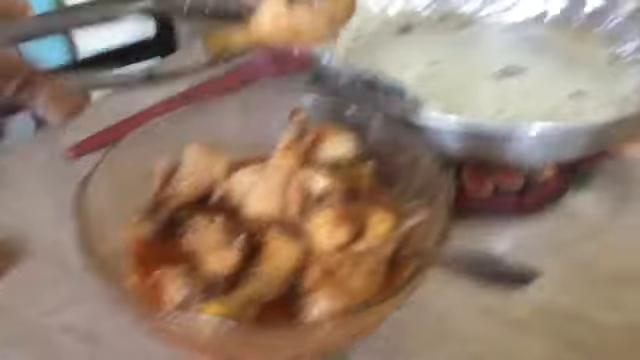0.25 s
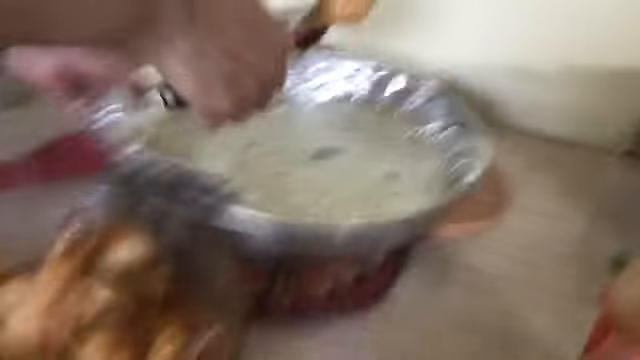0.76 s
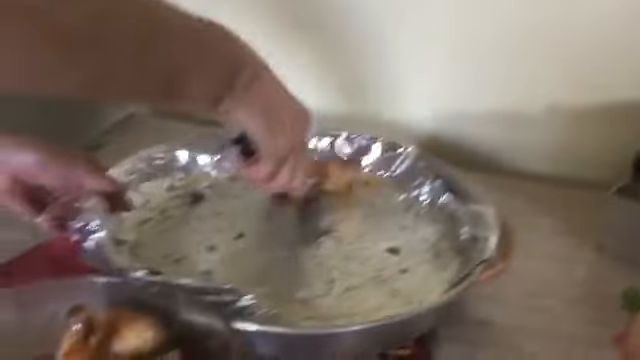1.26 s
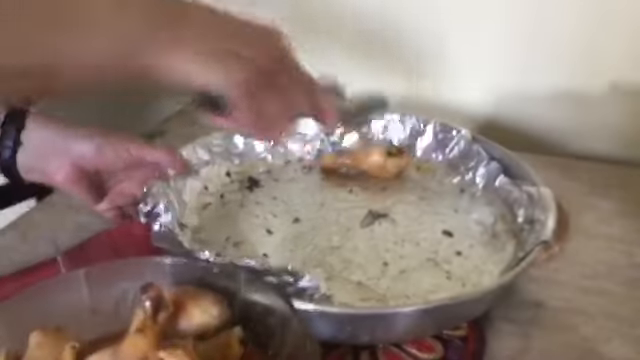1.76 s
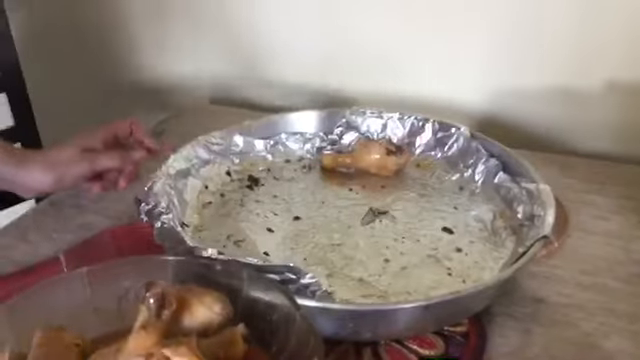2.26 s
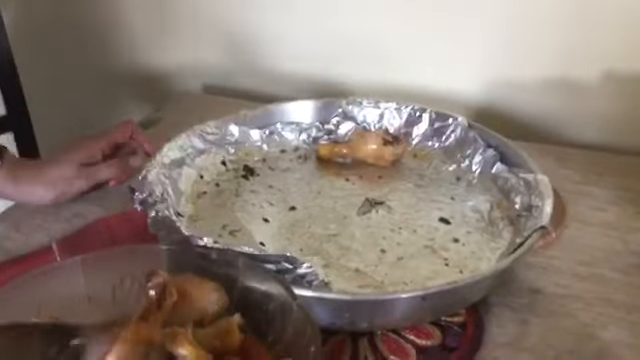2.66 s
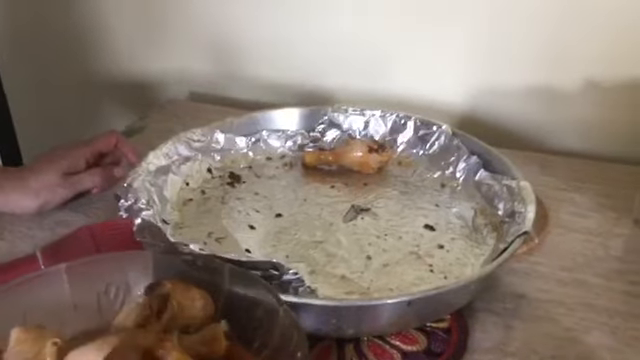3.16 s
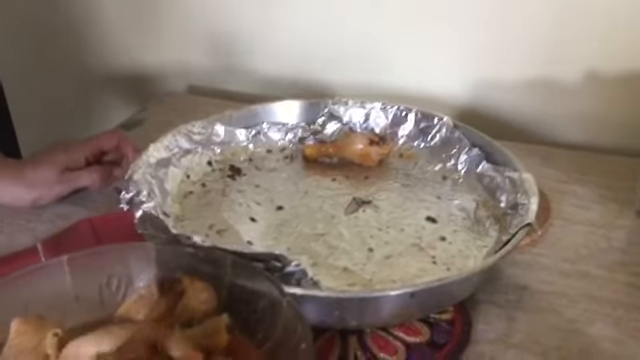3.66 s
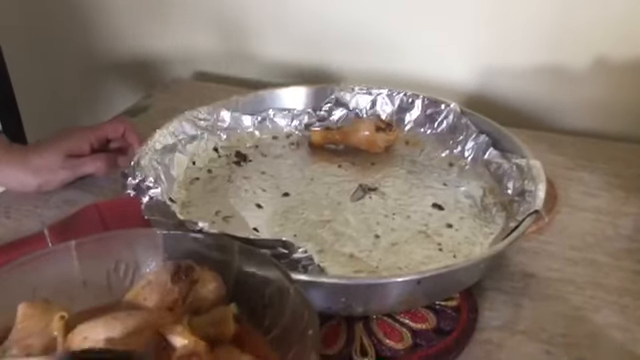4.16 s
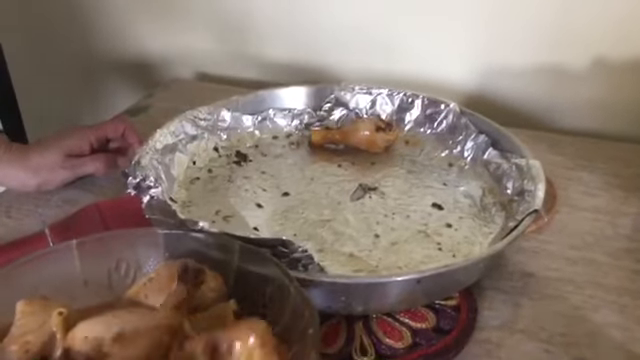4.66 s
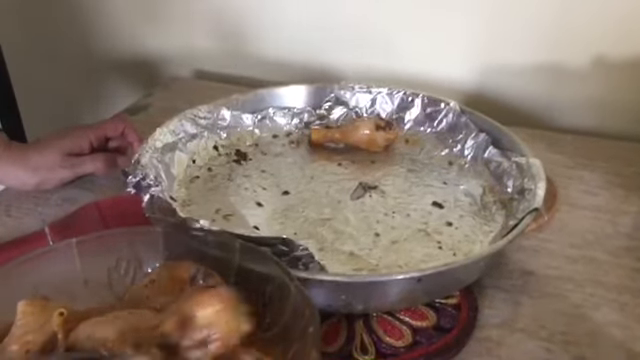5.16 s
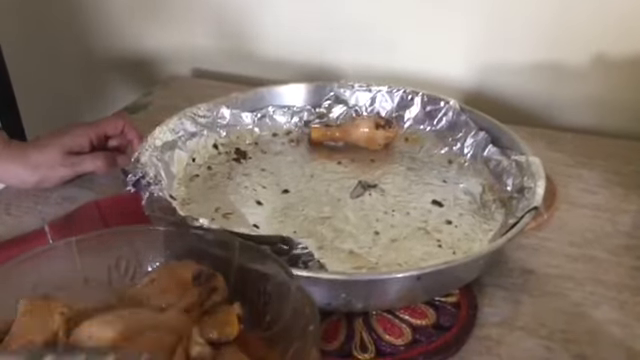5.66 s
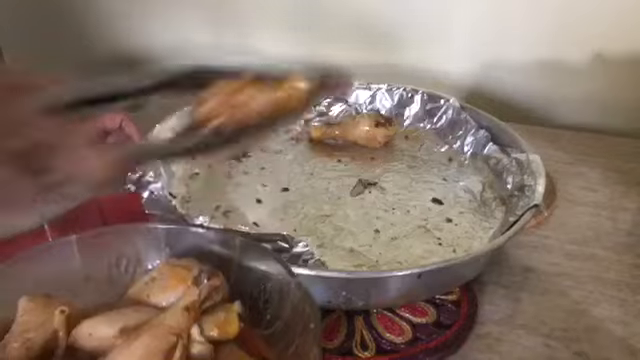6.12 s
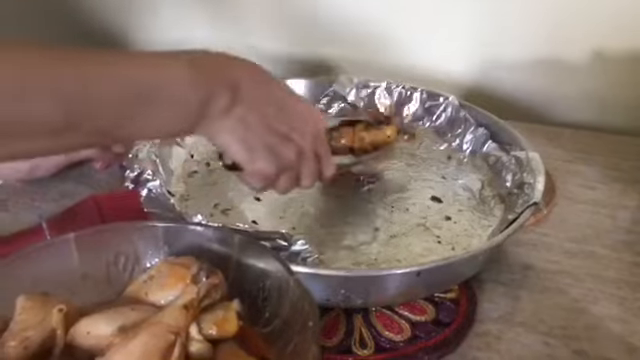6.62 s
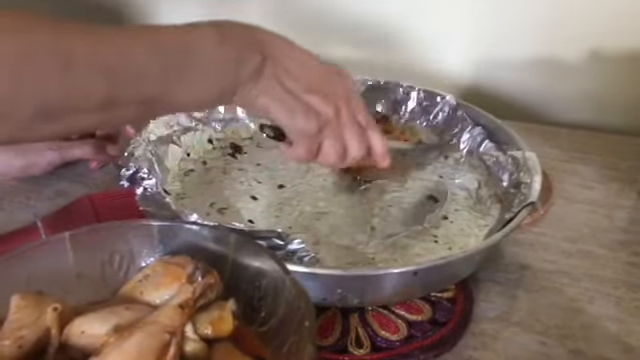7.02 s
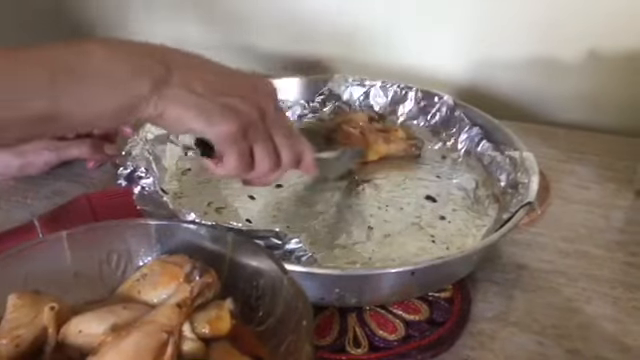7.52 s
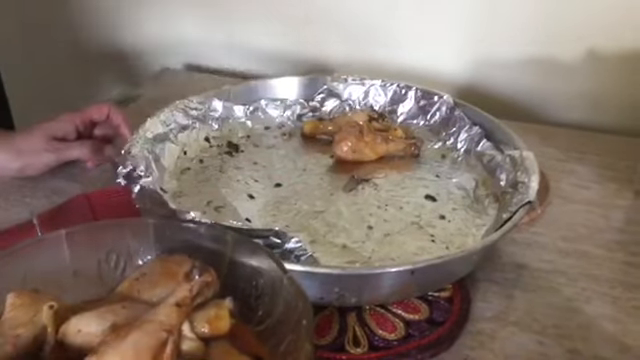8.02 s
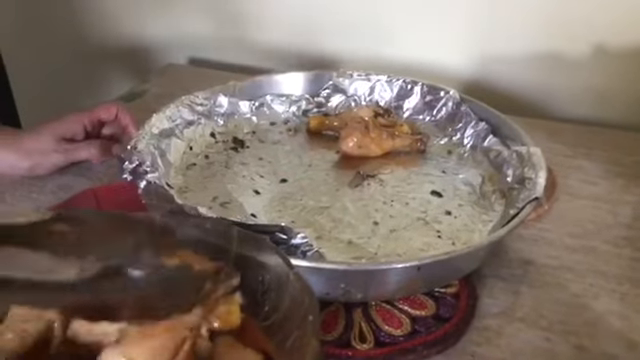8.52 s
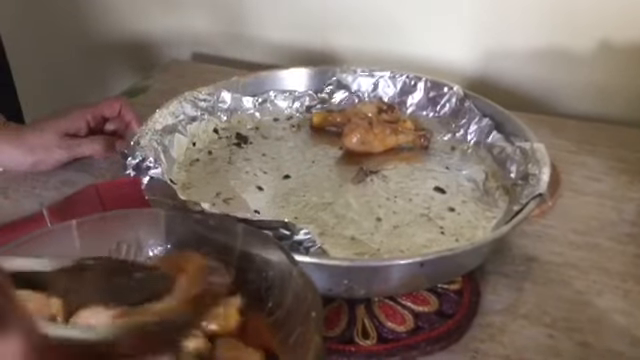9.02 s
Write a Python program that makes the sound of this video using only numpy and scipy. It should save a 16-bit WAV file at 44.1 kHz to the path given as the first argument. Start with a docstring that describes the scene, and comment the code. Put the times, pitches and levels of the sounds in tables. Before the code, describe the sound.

Steel tongs handle saucy food between a glass bowl and a foiled pan. Fumbling rustle and thumps come first, with a dull sheet-metal drop; then evenly spaced bright clacks with short glassy rings, lighter knocks and stick-slip rubbing. A quieter pan touch follows, then near silence and a few final ticks. Close microphone, small room reply, faint appliance hum.

```python
"""Tongs, glass bowl and foiled pan

Quiet kitchen, hand-held microphone: steel tongs lift food from a glass bowl to a foil-lined pan close by.
Clacks and drops are shaped noise that sets steel, glass, table and sheet-metal modes ringing; the room
answers with a noise tail. Finger bumps are falling sine swings, rubbing and rustle are shaped noise,
and beneath lie low rumble, room air and a faint appliance hum of narrow tones."""
import sys
import numpy as np
from scipy import signal
from scipy.fft import rfft, irfft, next_fast_len
from scipy.io import wavfile

SR = 44100
rng = np.random.default_rng(int(sys.argv[2]) if len(sys.argv) > 2 else 0)


def waveform_to_disk(signal):
    """Save audio, clipped to [-1, 1], as 16-bit WAV at the path in sys.argv[1]."""
    frames = np.transpose(np.atleast_2d(signal))
    scaled = np.clip(frames, -1, 1) * 32767
    samples = np.round(scaled).astype(np.int16)
    wavfile.write(sys.argv[1], SR, samples)


N = 409380
FFT_SIZE = next_fast_len(N)
HZ = np.maximum(np.fft.rfftfreq(FFT_SIZE, 1 / SR), 1)

# Spectra, relative: f/Hz, level/dB (per Hz)
RUMBLE_SPECTRUM = [(15, -34.5), (25, -6), (64, 4), (161, 1.5), (220, 0.5), (290, -31.5), (480, -120)]
AIR_SPECTRUM = [(180, -27), (300, -2), (400, -3), (700, -4.5), (1000, -15.5), (1500, -13.5), (2100, -18.5),
                (2600, -23.5), (5600, -31), (9300, -29.5), (13000, -32), (14500, -51.5)]   # steady room air
RUB_SPECTRUM = [(88, -45.5), (150, -15), (194, -21.5), (230, 7.5), (284, 4.5), (454, -10.5), (600, -11.5),
                (900, -17.5), (1500, -50)]
RUSTLE_SPECTRUM = [(350, -34), (600, -5), (1380, -8.5), (1790, -7.5), (3100, -12), (10300, -15.5),
                   (11600, -13), (13700, -20.5), (15000, -46.5)]
CRACK_SPECTRUM = [(1180, -43.5), (2000, -9), (2980, -6.5), (3250, -3.5), (4390, -7), (5420, 0.5),
                  (7720, -9.5), (8430, -4.5), (10800, -3.5), (12800, -5), (15400, -21)]
FOIL_SPECTRUM = [(600, 0.5), (1530, 0.5), (2600, 0.5), (2930, -8.5), (4160, -8), (11100, -15.5),
                 (15500, -23)]   # crunch of the foil

# Slow course of the room rumble: t/s, level/dB
RUMBLE_COURSE = [(0.0, -58), (0.393, -64), (3.36, -61), (8.14, -62), (9.28, -57)]
# Appliance tones: f/Hz, width/Hz, level/dB
HUM_TONES = [(60.5, 0.97, -65), (243, 11, -75), (1018, 9.7, -81), (1253, 25, -81), (2040, 6, -93.5)]
# A finger drags on the recorder's case: full from t/s, held/s, level/dB, dying t60/s
RUB_MOVES = [(0, 0.046, -51.5, 0.084), (.14, .22, -51, 0.08)]
# Hand, sleeve and foil movements: full from t/s, held/s, level/dB, dying t60/s
RUSTLE_MOVES = [(0, .27, -51, 0.47), (.475, 0.0035, -65, 0.29), (.9, 0.13, -65, 0.42),
                (1.185, 0.098, -54, 0.28), (1.48, 0.099, -72.5, 4.5), (1.92, 0.056, -71.5, 0.078),
                (2.51, 0.03, -72, 0.78), (4.72, 0.044, -74.5, 2.56), (6.3, 0.023, -76, 0.29),
                (7.66, 0.026, -75.5, 0.52), (8.83, 0.036, -69.5, 0.096), (8.95, 0.021, -70.5, 0.22),
                (9.14, 0.032, -70, 0.24)]
# Light ticks of steel, foil and food: t/s, level/dB, centre f/Hz
TICKS = [(0.067, -38, 2400), (0.115, -56, 11700), (0.122, -42, 8650), (0.2164, -36.5, 11100),
         (0.467, -54, 6060), (1.209, -40, 4100), (1.962, -55, 5270), (3.191, -49, 7400), (3.191, -55, 4620),
         (3.199, -53.5, 3985), (3.7436, -46, 9570), (5.0133, -51.5, 4720), (5.12, -53.5, 11400),
         (5.323, -49.5, 4060), (6.11, -57.5, 11560), (7.315, -56, 5330), (7.6693, -47.5, 6400),
         (8.3474, -58, 12400), (8.836, -52, 12500), (8.85, -49, 2930), (8.865, -57, 5500),
         (8.924, -51, 1770), (8.926, -57.5, 8600), (8.9456, -53.5, 12000), (8.953, -55, 3030),
         (8.957, -52, 12500), (8.9935, -51.5, 8600), (9.0059, -50.5, 2960), (9.089, -52, 3000),
         (9.145, -60, 6000), (9.1517, -49.5, 9570), (9.189, -57, 12000), (9.197, -52, 8300),
         (9.207, -47, 8360)]
# Fumbling, with fainter ticks at random: start t/s, length/s, ticks (rounded down), mean level/dB
FUMBLING = [(0.00097, 0.36, 12.4, -43.5)]
# Decay of the room: f/Hz, t60/s
ROOM_T60 = [(100, 0.46), (500, 0.36), (2000, 0.24), (6000, 0.36), (14000, 0.069)]
# Clacks of the tongs, levels relative: t/s, crack level/dB, knock level/dB, knock centre f/Hz,
# table thud level/dB, glass ring level/dB, rebound after/s, loss at the rebound/dB,
# two rings of the arm that shift with the grip f/Hz, f/Hz
CONTACTS = [(0.8058, -56.5, -36.5, 1500, -59, -80, 0.012, 6, 5170, 6340),
            (1.134, -47, -31, 2040, -76, -58, 0.02, 19, 5100, 6200),
            (3.2816, -12.5, -20, 1270, -28.5, -48, 0.011, 7.5, 5030, 6100),
            (3.5672, -12.5, -21.5, 1015, -36.5, -50, .0152, 10.5, 5500, 6690),
            (3.8299, -14, -22.5, 860, -49, -30.5, .017, 12.5, 8900, 11020),
            (4.1483, -15.5, -24.5, 1480, -36.5, -62, 0.011, 10, 5600, 6040),
            (4.481, -31, -34, 876, -65.5, -66.5, 0.022, 28, 3480, 5600),
            (4.5019, -35.5, -37, 1055, -52.5, -57.5, 0.0053, -3.5, 3410, 5100),
            (4.5854, -29.5, -23, 1450, -48, -62, 0.011, 25, 1320, 1775),
            (5.3519, -46, -37.5, 1466, -55, -73.5, 0.013, 27, 5200, 6300),
            (8.971, -47, -47.5, 1793, -65, -82, 0.0044, 10, 6000, 7900),
            (9.0933, -41.5, -54, 2500, -47.5, -84, 0.0057, 15, 3020, 6100),
            (9.221, -43.5, -37.5, 2800, -60, -79, 0.011, 25, 4450, 5700)]
# Modes, levels relative: f/Hz, level/dB, t60/s
CLANK_MODES = [(1737, -7, 0.048), (2936, -14.5, .03), (3330, -10.5, 0.012), (4000, -14, 0.035),
               (8437, -2, .02), (9330, -1, 0.017), (10260, -2, 0.018), (11400, 1, .02), (12550, -4, .018),
               (13000, -0.5, 0.02)]   # gripped tongs, which ring only briefly
BOWL_MODES = [(544, -1, 0.1), (860, 1.5, 0.041), (1626, -9.5, 0.066), (2330, -8.5, 0.22),
              (2410, -6.5, 0.34), (2550, -6.5, 0.22), (3570, -5.5, 0.16), (3990, -9.5, 0.15),
              (5030, -1, 0.1), (8170, -3, .09)]
TABLE_MODES = [(95, 0.5, 0.073), (163, -10.5, 0.15), (227.3, -2.5, 0.13), (319, -11.5, 0.099)]
PAN_MODES = [(359.8, -9.5, 0.044), (712, 0, 0.039), (864, -1.5, 0.045), (1070, -1, 0.029),
             (1630, -2, 0.037), (2280, -7.5, 0.055), (3640, -18, 0.053), (4220, -14.5, .03)]   # dull sheet metal
STEEL_MODES = [(1326, -9, 0.13), (1716, 3, 0.09), (2523, -2.5, 0.063), (3560, -13, 0.069),
               (5100, -13.5, 0.057), (6400, -22, 0.04), (8500, -26.5, 0.038)]   # tongs rubbed on the glass
# Finger bumps on the recorder's case: t/s, swing level/dB, settled pitch f/Hz, swing t60/s, tick level/dB
BUMPS = [(0.915, -30, 237.3, 0.17, -75), (0.9234, -11, 154, 0.012, -17.5), (0.941, -18, 120, 0.018, -28.5),
         (0.9937, -10.5, 183, 0.045, -24.5), (1.002, -9.5, 175, 0.023, -18.5),
         (1.024, -19, 115, 0.035, -29), (2.4262, -19, 221, 0.015, -40.5), (3.75, -35, 88, 0.092, -74.5),
         (4.547, -43.5, 325, 0.092, -80), (5.06, -43, 104, 0.29, -88.5), (8.991, -37, 107, 0.2, -90.5),
         (9.158, -38, 93, 0.12, -94), (9.249, -35.5, 106.5, 0.16, -87)]
# Food and tongs set down on the pan, relative: t/s, level/dB, treble against the usual/dB, base t60/s
DROPS = [(1.2135, -12, -16, 0.065), (1.22, -11.5, 0, 0.056), (5.962, -55, 3.5, 0.23),
         (6.787, -29.5, -33.5, 0.085), (6.868, -26, 2.5, 0.082)]
# Tongs rub on the glass, relative: start t/s, length/s, level/dB, brightness/dB per octave about 2 kHz
SLIDES = [(4.501, 0.08, -66.5, 9), (4.571, 0.024, -63.5, 9), (4.656, 0.089, -79.5, 9),
          (4.702, 0.026, -64.5, 1), (4.882, 0.086, -77.5, 10), (4.891, 0.02, -59, -0.8),
          (7.645, .18, -85.5, 2), (9.15, 0.034, -78, 10.5)]

AIR_DB = -70
GRIP_DB = -64.5   # the holding hand never lies quite still
ONSET_S = 0.026   # a movement swells this long before it is full
ROOM_DB, RING_TO_ROOM_DB = -10, -4.5   # the walls get less of the rings than of the cracks
CRACK_T60_S, REBOUND_T60_S = 0.049, 0.057   # at the strongest clack
LIGHT_SHORTENS = 0.12   # a lighter clack is shorter: dB of length per dB of crack
CLANK_DB, CLANK_FOLLOWS = -6, 1.145   # steel: dB at a 0 dB crack, dB per dB of crack
ARM_DB, ARM_T60_S = -4.5, 0.038   # against the clank
WAVER_DB, WAVER_PER_S = 3.5, 130   # the ring of the filled bowl is rough
SPLIT = 0.015   # an uneven shape splits each mode in two that beat
STIFFEN_CYCLES = 3.223   # a harder bump starts higher: extra cycles per unit of swing
TOP_STOP_HZ = 17100   # the treble is 70 dB down from here


def from_db(db):
    """Decibels to gain."""
    return 10 ** (np.asarray(db) / 20)


def rms_one(x):
    """Scale to rms 1."""
    return x / np.sqrt(np.mean(x ** 2) + 1e-20)


def at_hz(points, hz):
    """Read a table on a log-frequency axis."""
    table_hz, values = np.transpose(points)
    return np.interp(np.log(hz), np.log(table_hz), values)


def filtered(x, low_hz, high_hz):
    """Pass one band of a sound."""
    return signal.sosfilt(signal.butter(2, [low_hz, high_hz], "band", fs=SR, output="sos"), x)


def coloured(spectrum, grain_db=0., per_s=3000.):
    """Noise of rms 1 with the given spectrum; grain_db makes it crackle with uneven clicks."""
    hits = rng.random(N) < per_s / SR
    grains = hits * from_db(grain_db * np.minimum(rng.exponential(1, N), 4))
    source = rng.standard_normal(N) * (4.5 + np.sign(grain_db) * grains)
    shaped = rfft(source, FFT_SIZE) * from_db(at_hz(spectrum, HZ))
    return rms_one(irfft(shaped, FFT_SIZE)[:N])


def drift(rate):
    """Wander in straight lines between random points of spread 1, rate points a second."""
    knots = rng.standard_normal(1500)
    return np.interp(np.arange(N) / SR * rate, np.arange(len(knots)), knots)


def decay(t, db, t60, rise_s):
    """A quick rise, then an exponential fall by 60 dB in t60."""
    return from_db(db - 60 * t / t60) * (1 - np.exp(-t / rise_s))


def bursts(times, dbs, t60s, rise_s):
    """Envelope that jumps up at each time and dies away."""
    out, t = np.zeros(N + SR // 4), np.arange(SR // 4) / SR
    for s, db, t60 in zip(times, dbs, t60s):
        i = round(s * SR)
        out[i:i + len(t)] += decay(t, db, max(t60, .004), rise_s)
    return out[:N]


def puffs(times, dbs, centres_hz, t60s, rise_s, octaves):
    """Short puffs of noise, each about its own pitch, octaves wide to either side."""
    out, t = np.zeros(N + 4096), np.arange(4096) / SR
    whites = rng.standard_normal((len(times), len(t)))
    for s, db, hz, t60, white in zip(times, dbs, centres_hz, t60s, whites):
        puff = rms_one(filtered(white, hz / 2 ** octaves, min(hz * 2 ** octaves, .45 * SR)))
        i = round(s * SR)
        out[i:i + len(t)] += puff * decay(t, db, max(t60, .004), rise_s)
    return out[:N]


def ring(force, hz, t60):
    """Two-pole resonator: a unit click sets a decaying sine of height 1 ringing."""
    r, w = from_db(-60 / (t60 * SR)), 2 * np.pi * hz / SR
    return signal.lfilter([0, np.sin(w)], [1, -2 * r * np.cos(w), r * r], force + 1e-18)


def pair(force, hz, t60):
    """A split mode: two close rings that beat."""
    t60 = max(t60, .01)
    return ring(force, hz, t60) + 0.4 * ring(force, hz * (1 + SPLIT), t60)


def struck(modes, times, dbs, spread_db, tilts_db=0):
    """Each contact strikes each mode with its own strength; tilts_db is per octave above the lowest mode."""
    at, out = np.round(times * SR).astype(int), np.zeros(N)
    spread = rng.standard_normal((len(at), len(modes)))
    for k, (hz, level_db, t60) in enumerate(modes):
        force = np.zeros(N)
        tilt_db = tilts_db * np.log2(hz / modes[0][0])
        force[at] = from_db(dbs + level_db + spread_db * spread[:, k] + tilt_db)
        out += pair(force, hz, t60) * (-1) ** k   # neighbouring modes start in opposite directions
    return out


def movements(rows):
    """Envelope in which each movement swells, holds and dies away."""
    t, out = np.arange(N) / SR, np.zeros(N)
    for s, held, db, t60 in rows:
        swell = np.clip((t - s) / ONSET_S + 1, 0, 1)
        out += swell * from_db(db - 60 * np.maximum(t - s - held, 0) / t60)
    return out


def rumble():
    """Low noise of the room that follows a slow course and wavers about it."""
    course_db = np.interp(np.arange(N) / SR, *np.transpose(RUMBLE_COURSE))
    return from_db(course_db + 3.5 * drift(7.8)) * coloured(RUMBLE_SPECTRUM)


def room_air():
    """Almost steady noise of the room air."""
    return from_db(AIR_DB + 0.24 * drift(2.2)) * coloured(AIR_SPECTRUM)


def hum():
    """An appliance hums: noise through narrow resonators gives wavering tones."""
    white = rng.standard_normal(N)
    return sum(from_db(db) * rms_one(ring(white, hz, 2.5 / width)) for hz, width, db in HUM_TONES)


def rubbing():
    """Finger friction on the case comes in lumps, over the faint stir of the grip."""
    strength = movements(RUB_MOVES) + from_db(GRIP_DB)
    return strength * from_db(4.3 * drift(30)) * coloured(RUB_SPECTRUM)


def rustle():
    """Hand, sleeve and foil rustle in uneven grains."""
    grains = coloured(RUSTLE_SPECTRUM, grain_db=7.0, per_s=900.0)
    return movements(RUSTLE_MOVES) * from_db(4.0 * drift(50)) * grains


def ticks():
    """Noise puffs a few milliseconds long; fumbling scatters fainter ones between 4 and 13 kHz."""
    faint = []
    for s, length, count, db in FUMBLING:
        for when, size, pitch in rng.random((int(count), 3)):
            faint.append((s + length * when, db + 10.0 * (size - .5), 4000 * 2 ** (1.7 * pitch)))
    s, db, hz = np.transpose(list(TICKS) + faint)
    return puffs(s, db, hz, np.full(len(s), .016), .0004, octaves=0.22)


def kitchen(x):
    """Diffuse reply of the room: noise dying at its own rate in each octave."""
    t, tail = np.arange(SR) / SR, 0
    for hz in 62.5 * 2. ** np.arange(8):
        octave = filtered(rng.standard_normal(SR), hz, 2 * hz)
        tail = tail + octave * from_db(-60 * t / at_hz(ROOM_T60, 1.1 * hz))
    tail = tail * (1 - np.exp(-(t / 0.00037) ** 2))   # the reply sets in within a millisecond
    return from_db(ROOM_DB) * signal.fftconvolve(x, tail / np.sqrt(np.sum(tail ** 2)))[:N]


def arm(times, dbs, pitches_hz):
    """One ring of the tongs' arm per contact, at the pitch that the grip allows."""
    out, click = np.zeros(N + 4096), np.arange(4096) == 0
    for s, db, hz in zip(times, dbs, pitches_hz):
        i = round(s * SR)
        out[i:i + len(click)] += from_db(db) * pair(click, hz, ARM_T60_S)
    return out[:N]


def tongs():
    """Snap, short crack and duller knock set steel, glass and table ringing, then rebound: noises, rings."""
    s, crack_db, knock_db, knock_hz, thud_db, glass_db, rebound_s, loss_db, *arm_hz = np.transpose(CONTACTS)
    shortening = from_db(LIGHT_SHORTENS * (crack_db - crack_db.max()))
    t60 = np.outer([CRACK_T60_S, REBOUND_T60_S], shortening).ravel()

    # list the rebounds after the first blows; the duller parts lose less
    s = np.append(s, s + rebound_s)
    knock_hz, arm_hz = np.tile(knock_hz, 2), np.tile(arm_hz, 2)
    crack_db = np.append(crack_db, crack_db - loss_db)
    knock_db = np.append(knock_db, knock_db - .6 * loss_db)
    thud_db = np.append(thud_db, thud_db - .4 * loss_db)
    glass_db = np.append(glass_db, glass_db - .7 * loss_db)

    snap = bursts(s, crack_db - 2.0, np.full(len(s), .005), 0.00011)
    body = bursts(s, crack_db - 14.5, t60, 0.0003)
    crack = (snap + body) * coloured(CRACK_SPECTRUM, grain_db=3.0, per_s=2900.0)
    knock = puffs(s, knock_db - 4.0, knock_hz, .8 * t60, 0.0023, octaves=1.0)
    # the blow reaches the table top a moment later
    thud = struck(TABLE_MODES, s + 0.004, thud_db, spread_db=3.0)

    clank_db = CLANK_DB + CLANK_FOLLOWS * crack_db
    steel = struck(CLANK_MODES, s, clank_db, spread_db=1.8)
    steel = steel + sum(arm(s, clank_db + ARM_DB, hz) for hz in arm_hz)
    glass = struck(BOWL_MODES, s, glass_db, spread_db=1.1) * from_db(WAVER_DB * drift(WAVER_PER_S))
    return crack + knock + thud, steel + glass


def bumps():
    """A bump flexes the case: a swing that swells as its pitch falls, with a shake and a dry tick."""
    out, t = np.zeros(N + SR // 8), np.arange(SR // 8) / SR
    for s, db, hz, t60, tick_db in BUMPS:
        cycles = hz * t + STIFFEN_CYCLES * from_db(db) * (1 - np.exp(-t / 0.00048))
        i = round(s * SR)
        out[i:i + len(t)] += decay(t, db, max(t60, .005), 0.0006) * np.sin(2 * np.pi * cycles)
    s, db, hz, t60, tick_db = np.transpose(BUMPS)
    # the whole hand shakes with it
    jolt = bursts(s, db - 10.5, 2.0 * t60, 0.011) * rms_one(filtered(rng.standard_normal(N), 61.3, 181))
    dry_noise = rms_one(filtered(rng.standard_normal(N), 600, 10500))
    dry_ticks = bursts(s, tick_db, np.full(len(s), .007), 0.0023) * dry_noise
    return out[:N] + jolt + dry_ticks


def pan():
    """A dull sheet-metal knock under a longer crunch of foil; a soft landing dulls both: noises, rings."""
    s, db, treble_db, t60 = np.transpose(DROPS)
    body = struck(PAN_MODES, s, db - 11.0, spread_db=3.0, tilts_db=0.28 * treble_db)
    crunch = bursts(s, db + treble_db - 14.0, 1.1 * t60, 0.00035)
    lingering = bursts(s, db + treble_db - 31.5, 2.1 * t60, 0.0019)
    return (crunch + lingering) * coloured(FOIL_SPECTRUM, grain_db=7.0, per_s=540.0), body


def sliding():
    """Stick-slip: dense uneven clicks under each stroke drive the steel, tilted by the stroke's brightness."""
    slips = (rng.random(N) < 2500. / SR) * rng.standard_normal(N) * from_db(2.5 * drift(50))
    t = np.arange(N) / SR
    s, length, db, tilt = np.transpose(SLIDES)
    progress = np.clip((t - s[:, None]) / length[:, None], 0, 1)
    strokes = np.sin(np.pi * progress ** 0.45) * slips   # one row a stroke, strongest early on
    rings = np.zeros(N)
    for hz, level_db, t60 in STEEL_MODES:
        force = from_db(level_db + db + tilt * np.log2(hz / 2000)) @ strokes
        rings += pair(force, hz, t60)
    grit = filtered(from_db(db + 2.3 * tilt + 7.5) @ strokes, 1500, 9000)
    return rings + grit


def scene():
    """Only the airborne contacts reach the walls; case handling and background are heard without reply."""
    clack_noise, clack_rings = tongs()
    drop_noise, drop_rings = pan()
    noises = ticks() + clack_noise + drop_noise + sliding()
    rings = clack_rings + drop_rings
    room = kitchen(noises + from_db(RING_TO_ROOM_DB) * rings)
    background = rumble() + room_air() + hum() + rubbing() + rustle()
    return (background + noises + rings + room + bumps())[None]


def record(dry):
    """At the microphone the deep bass falls away below 40 Hz and the top is cut."""
    bass_cut = signal.sosfilt(signal.butter(2, 40, "high", fs=SR, output="sos"), dry)
    return signal.sosfilt(signal.cheby2(12, 70, TOP_STOP_HZ, fs=SR, output="sos"), bass_cut)


dry = scene()
out = record(dry)
waveform_to_disk(out)
```